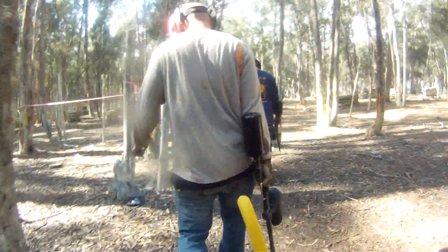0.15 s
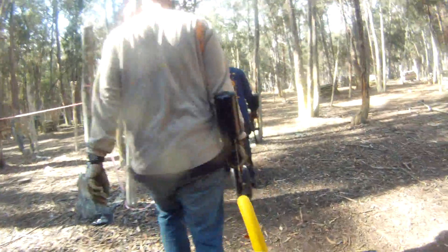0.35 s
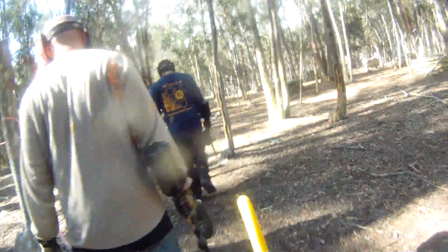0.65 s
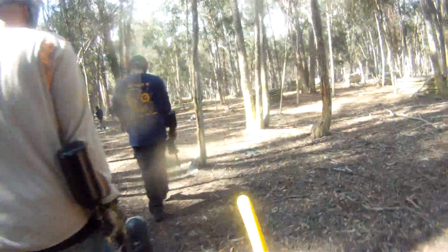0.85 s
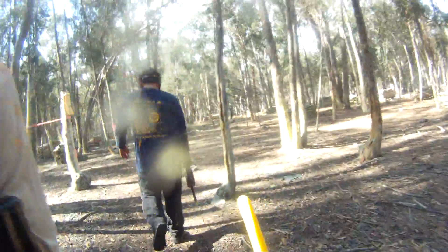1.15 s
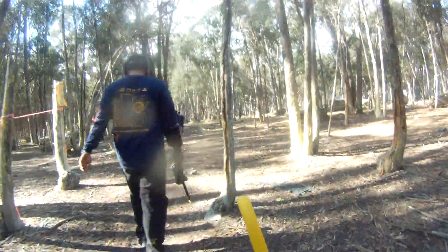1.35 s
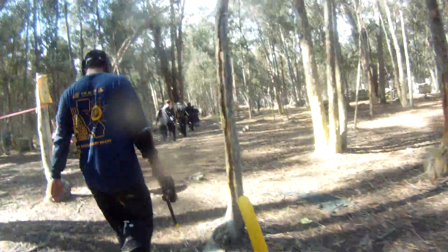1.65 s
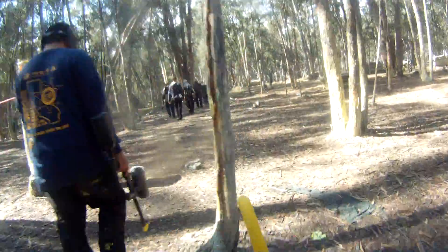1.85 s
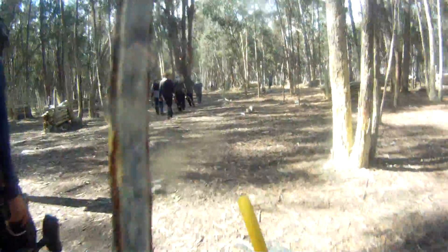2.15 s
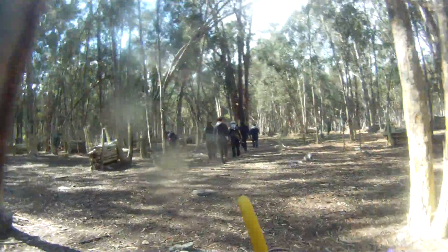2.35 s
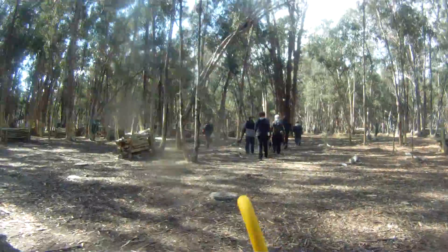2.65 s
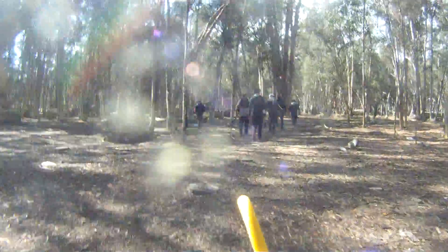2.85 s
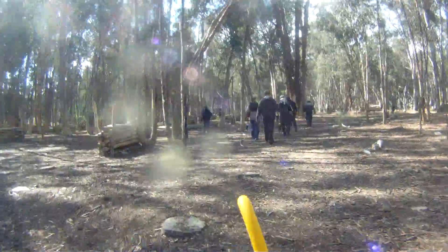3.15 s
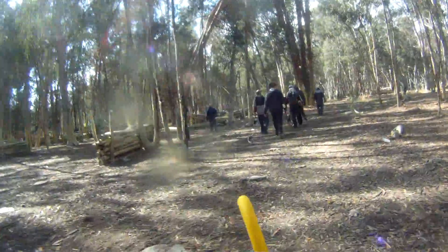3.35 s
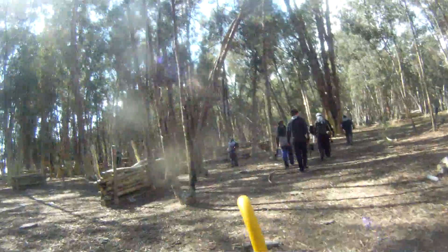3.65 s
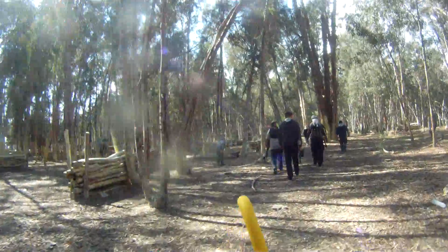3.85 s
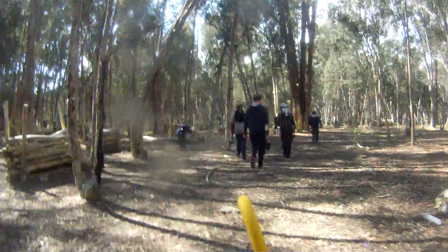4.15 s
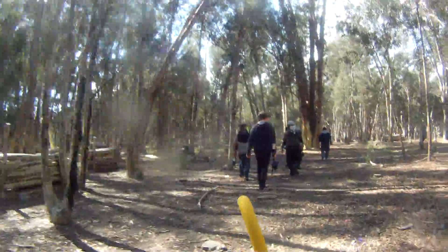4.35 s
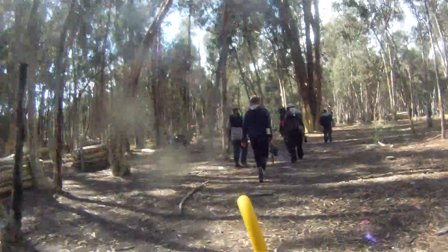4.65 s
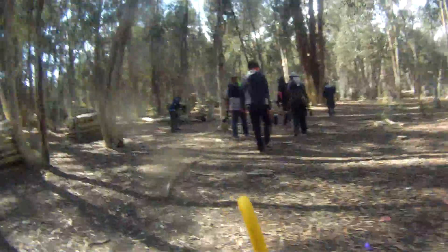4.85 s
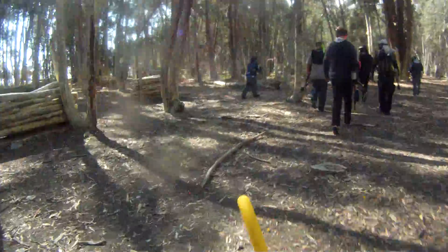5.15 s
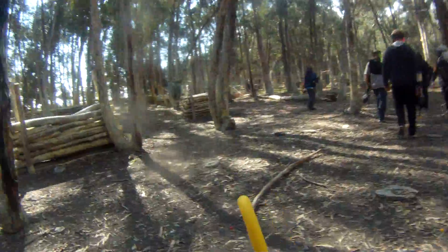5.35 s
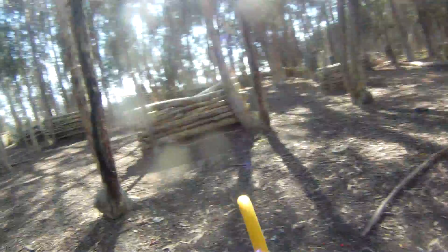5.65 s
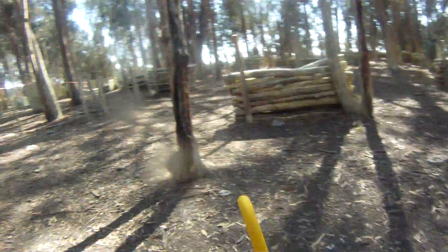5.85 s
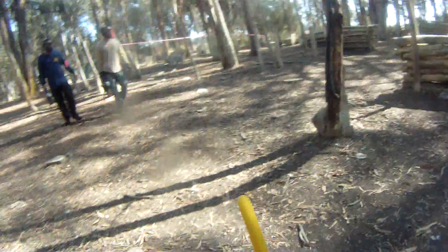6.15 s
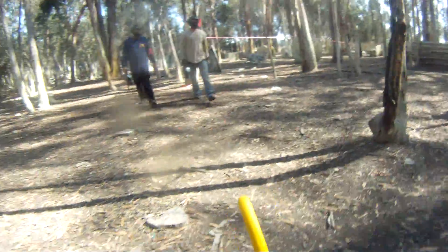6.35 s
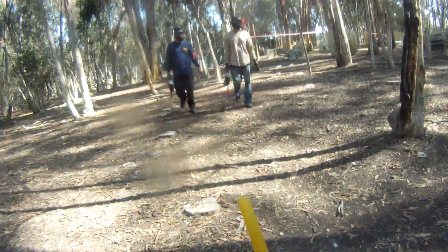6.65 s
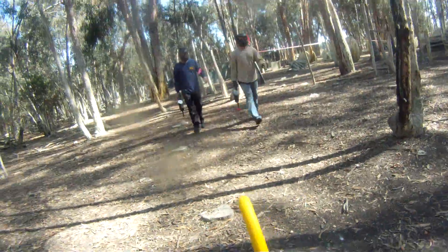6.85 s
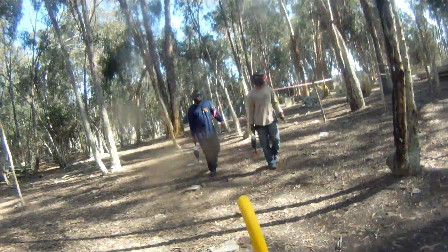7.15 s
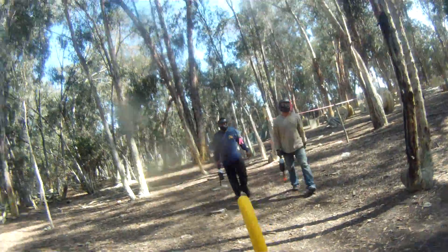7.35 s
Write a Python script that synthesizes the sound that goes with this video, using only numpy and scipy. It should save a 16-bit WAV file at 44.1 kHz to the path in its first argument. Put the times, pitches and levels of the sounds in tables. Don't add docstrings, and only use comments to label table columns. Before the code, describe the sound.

Footsteps crunch over dry leaves and bark, twigs snapping underfoot, while a cased camera's mount thumps and rumbles low against a faint hiss.

```python
import sys
import numpy as np
from scipy import signal
from scipy.io import wavfile
from scipy.ndimage import uniform_filter1d, minimum_filter1d

SR = 44100
rng = np.random.default_rng(int(sys.argv[2]) if len(sys.argv) > 2 else 0)


def store_pcm(level_fs):
    pcm = np.round(np.clip(level_fs, -1, 1) * 32767).astype(np.int16)
    wavfile.write(sys.argv[1], SR, np.atleast_2d(pcm).T)


def to_linear_factor(level_db):
    exponent = np.asarray(level_db, float) / 20
    return 10 ** exponent


N = 330448

# pitch in Hz, level in dB per Hz.
CASE_COLOUR = [(180, -32), (310, -15), (344, -24), (397, -7.5), (445, -7), (580, 4.5), (620, 3.5),
               (708, -8), (757, -11.5), (848, 1.5), (1120, 3), (1510, -7.5), (1980, 3.5), (2430, -19),
               (3000, -25.5), (3900, -155), (6600, -120)]
# start in seconds, peak in dB, ring pitch in Hz, time to fall 60 dB in seconds.
TWIG_SNAPS = [(0.376, -19.5, 1720, 0.01), (0.804, -16.5, 1990, 0.021), (0.926, -14, 2020, 0.032),
              (1.324, -31.5, 1880, 0.0087), (2.159, -15, 1380, 0.017), (2.329, -13, 1840, 0.023),
              (2.581, -21, 1860, 0.0072), (3.378, -11.5, 1720, 0.01), (3.405, -15, 1820, 0.01),
              (3.721, -23, 1850, 0.0084), (3.730, -16, 1800, 0.011), (4.052, -16, 1940, 0.014),
              (4.145, -19, 1680, 0.0055), (4.215, -27, 1810, .012), (1.88, -36, 1820, 0.01),
              (1.709, -24.5, 2200, 0.0071), (2.402, -26, 1070, .012), (4.348, -5, 1700, 0.01),
              (4.541, -24, 1800, 0.01), (4.694, -18, 1900, 0.0059), (4.699, -4.5, 1820, 0.015),
              (5.527, -17, 1680, 0.014), (5.559, -18.5, 1945, 0.014), (6.081, -11.5, 1760, 0.0053),
              (7.148, -14.5, 1970, 0.016)]
# start in seconds, peak in dB, ring pitch in Hz, time to fall 60 dB in seconds.
BARK_CRACKS = [(0.657, -14.5, 1080, 0.02), (1.186, -31.5, 1100, 0.023), (1.386, -10, 1222, 0.098),
               (1.406, -13.5, 1050, .015), (1.506, 0, 1380, 0.0057), (1.529, -16.5, 1070, 0.077),
               (1.581, -13, 970, 0.017), (2.011, -10, 1070, 0.034), (2.123, -7, 1400, 0.0054),
               (2.456, -24.5, 875, 0.046), (2.639, -7.5, 1170, 0.013), (2.731, -9.5, 1090, 0.0029),
               (3.313, -24, 1020, 0.021), (3.748, -16.5, 1160, 0.01), (3.946, -7, 1150, 0.023),
               (4.003, -13, 600, 0.02), (4.109, -16, 1120, 0.017), (4.157, -11.5, 977, 0.046),
               (4.5, -29.5, 1100, 0.039), (4.622, -12.5, 1100, 0.022), (4.754, -4.5, 1330, 0.012),
               (4.776, -16.5, 1010, .015), (4.872, -23.5, 1010, 0.022), (5.025, -14, 915, 0.0093),
               (5.279, -14.5, 990, 0.038), (5.469, -10.5, 1140, 0.0028), (6.066, -44, 533, 0.017),
               (6.449, -24, 1160, 0.019), (6.638, -21.5, 1031, 0.017), (6.695, -29.5, 1140, 0.015),
               (7.102, -13.5, 1116, 0.03), (7.244, -34.5, 1200, 0.0086), (7.422, -28.5, 600, 0.028)]


def evened(x):
    return x / np.sqrt(np.mean(x ** 2) + 1e-20)


def coloured(x, points):
    f, db = np.transpose(points)
    hz = abs(np.fft.fftfreq(2 ** 14, 1 / SR))
    all_db = np.interp(np.log(hz + 1), np.log(f + 1), np.maximum(db, -90))
    log_gain = all_db * np.log(10) / 20
    response = np.exp(np.conj(signal.hilbert(log_gain)))
    taps = np.fft.ifft(response).real[:2 ** 13]
    return signal.oaconvolve(x, taps)[:len(x)]


def low_passed(x, cut_hz):
    return signal.sosfilt(signal.butter(4, cut_hz, fs=SR, output="sos"), x)


def clumps(spread_db, s):
    width = max(round(s * SR), 2)
    drift = uniform_filter1d(uniform_filter1d(rng.standard_normal(N), width), width)
    return to_linear_factor(spread_db * evened(drift))


def steadied(x, s, share):
    power = abs(uniform_filter1d(evened(x) ** 2, max(round(s * SR), 2))) + 1e-3
    return evened(x / power ** (np.clip(share, 0, 1) / 2))


def grains(per_s, spread_db, low_hz, high_hz, turns, count=16):
    size = to_linear_factor(spread_db * np.minimum(rng.exponential(1, N), 4)) * rng.choice([-1., 1.], N)
    size = size * (rng.random(N) < per_s / SR)
    kind, out = rng.integers(0, count, N), np.zeros(N)
    for k, hz in enumerate(np.geomspace(low_hz, high_hz, count)):
        cycles = np.arange(1024) / SR * hz
        grain = np.sqrt(hz) * cycles * np.exp(-cycles / turns) * np.sin(2 * np.pi * cycles)
        out += signal.oaconvolve(size * (kind == k), grain)[:N]
    return out


def curve(rows):
    s, *values = np.transpose(rows)
    return [np.interp(np.arange(N) / SR, s, v) for v in values]


def bursts(rows, rise, sag_db, fall):
    linger = 0.097
    t, power = np.arange(N) / SR, np.zeros((2, N))
    for s, length, db, *above_db in rows:
        a, b = np.searchsorted(t, [s - rise / 2, s + length + 12 * fall])
        u = t[a:b] - s
        gone = np.maximum(u - length, 0) / fall
        let_go = np.exp(-gone) + linger * np.exp(-gone / 2.3)
        shape = np.clip(u / rise + .5, 0, 1) ** 2 * let_go
        held_db = db - sag_db * (u / length - .5)
        power[:, a:b] += (shape * to_linear_factor(held_db + np.c_[[0, sum(above_db)]])) ** 2
    return power


def ring(peak_db, hz, t60, rise, sag):
    t = np.arange(8192) / SR
    t60 = max(t60, .003)
    shape = to_linear_factor(-60 * t / t60) * (1 - np.exp(-t / rise)) ** 2
    turns = np.cumsum(hz * (1 - sag + sag * np.exp(-t / t60 * 2))) / SR
    return to_linear_factor(peak_db) * shape / shape.max() * np.sin(2 * np.pi * turns)


def add(mix, s, sound):
    part = mix[round(s * SR):][:len(sound)]
    part += sound[:len(part)]


def hiss():
    # pitch in Hz, level in dB per Hz.
    hiss_colour = [(150, -40), (250, -11), (322, 26), (526, 24.5), (754, 12), (920, -52), (1910, -15),
                   (2740, 12), (6000, 4.5), (7800, -88), (13200, -120)]
    return to_linear_factor(-64) * evened(coloured(rng.standard_normal(N), hiss_colour))


def mount():
    # time in seconds, wobble level in dB.
    sway = [(0, -53.5), (.3, -47), (.55, -44.5), (1.06, -52), (1.3, -42), (1.62, -28), (1.95, -44),
            (2.5, -35), (2.9, -31), (3.2, -37), (3.5, -29.5), (3.87, -37), (4.5, -46), (5.1, -32),
            (6, -28.5), (6.75, -35.5), (7, -33.5), (7.3, -37.5)]
    # start in seconds, length in seconds,
    # wobble level in dB, rumble level above it in dB.
    jolts = [(.105, 0.12, -27.5, -9), (.234, 0.24, -32, -15.5), (.369, 0.031, -16, -17),
             (.629, 0.29, -21, -9.5), (.853, 0.18, -29.5, -14), (1.117, 0.065, -32, -12.5),
             (1.337, 0.24, -21.5, -5.5), (1.661, 0.16, -17.5, -11), (1.821, 0.076, -24, -20.5),
             (2.01, 0.12, -17.5, -10.5), (2.14, 0.32, -25, -10.5), (2.604, 0.16, -18.5, -10.5),
             (3.068, 0.081, -32, -7), (3.317, 0.12, -27, -3), (3.392, 0.065, -15.5, -21),
             (3.527, 0.032, -17.5, -20), (3.702, 0.093, -27.5, -1), (3.781, 0.028, -16.5, -14),
             (3.961, 0.2, -19.5, -7), (4.166, 0.31, -25, -15), (4.375, 0.043, -21.5, -8.5),
             (4.545, 0.32, -24, -4), (4.964, 0.07, -18, -23), (5.019, 0.035, -12, -10.5),
             (5.253, 0.17, -26.5, -5), (6.136, 0.039, -15.5, -25), (6.42, 0.13, -27, -11),
             (6.859, 0.097, -32, -2), (7.095, 0.086, -23, -30), (7.363, 0.15, -27, -13.5),
             (0.596, 0.041, -28.5, -7),
        (0.752, 0.075, -16, -15),
        (1.972, 0.025, -28.5, 1),
        (2.733, 0.011, -17.5, -2.5),
        (3.899, 0.051, -28.5, 0.5),
        (4.333, 0.019, -31, 7.5),
        (7.059, 0.054, -24.5, -5),
    ]
    # pitch in Hz, level in dB per Hz.
    rumble_colour = [(12, -87), (20, -38), (43, -13.5), (69, -1), (87, 0), (97, -2), (119, -9), (209, -17),
                     (287, -38), (330, -60.5), (430, -39.5), (730, -120)]
    # start in seconds, peak in dB, ring pitch in Hz.
    kick_rows = [(0.113, -6, 82), (0.376, -7, 88), (0.747, -19, 85), (1.339, -6, 86), (1.398, -17, 87),
                 (1.509, -1, 89), (1.677, -5, 87.6), (2.008, -6, 95), (2.327, -4.5, 73.6),
                 (2.378, -4.5, 87), (2.608, -28, 82), (2.654, -27, 88), (2.734, 1.5, 87),
                 (3.067, -5.5, 90.7), (3.4, -4, 82.5), (3.532, -15, 76.4), (3.71, -19, 80), (3.78, -15, 88),
                 (4.05, -0.5, 79.6), (4.344, -13, 75), (4.543, -3.5, 83), (5.018, -18, 172),
                 (5.024, -13, 82.6), (6.139, -11, 85), (6.869, -6.5, 101.4), (7.102, -5, 90)]
    wobble_hz, sway_rumble_db = 85.55, -5.5

    sway_db, = curve(sway)
    pushes = bursts(jolts, rise=0.015, sag_db=0, fall=0.018)
    level, shake = np.sqrt(pushes + to_linear_factor(sway_db + np.c_[[0, sway_rumble_db]]) ** 2)

    nudges = uniform_filter1d(rng.standard_normal((2, N)), 1500, axis=1)
    a, b = evened(uniform_filter1d(nudges, 1100, axis=1))
    swing = 1 + 0.98 * (a + 1j * b)
    swing = swing / (uniform_filter1d(abs(swing), 1200) + 0.42) ** 0.78
    wobble = evened((swing * np.exp(2j * np.pi * wobble_hz * np.arange(N) / SR)).real)

    f, db = np.transpose(rumble_colour)
    flat = np.transpose([f, np.where(abs(np.log(f / 85)) < .3, -21, db)])
    shaking = rng.standard_normal(N) * clumps(3.3, 0.019)
    rumble = steadied(coloured(shaking, flat), 0.029, 0.37)

    kicks = np.zeros(N)
    for s, peak_db, hz in kick_rows:
        add(kicks, s, ring(peak_db - 10.5, hz, t60=0.16, rise=0.0056, sag=0.07))
    return level * wobble + to_linear_factor(2.0) * shake * rumble + kicks


def crunch():
    # time in seconds, low crunch level in dB, bright crunch above it in dB.
    shuffle = [(0, -56, -12), (.55, -59, -1), (1.05, -60, 1.5), (1.35, -52.5, -3.5), (1.63, -44.5, -4),
               (1.93, -50, -3.5), (2.3, -40.5, -1), (2.53, -49, -2.5), (2.98, -41, -19), (3.2, -53.5, 3),
               (3.5, -40.5, -10), (3.88, -51.5, -2), (4.5, -48, -3.5), (4.97, -45, -3), (5.46, -47, -1.5),
               (6.03, -55.5, -9), (6.75, -57.5, -6.5), (7.3, -48.5, -10)]
    # start in seconds, length in seconds,
    # low crunch level in dB, bright crunch above it in dB.
    soles = [(.1, 0.032, -42.5, -2), (.14, 0.064, -35.5, -17.5), (.22, 0.024, -39.5, -9.5),
             (.354, 0.082, -40, -5), (.585, 0.0071, -47.5, 9), (.615, 0.18, -36, -4),
             (.8, 0.085, -30, -6.5), (.87, 0.023, -28, -17), (.915, 0.039, -27, -8.5),
             (.963, 0.096, -47.5, -31), (1.427, 0.17, -25, -11.5), (1.66, 0.071, -30.5, -13),
             (1.745, 0.1, -30, -10.5), (1.971, 0.068, -36, -7.5), (2.05, 0.13, -26.5, -1),
             (2.574, 0.029, -34, 3), (2.615, 0.19, -28.5, -3.5), (2.779, 0.17, -38, -5.5),
             (3.038, 0.11, -35, -6), (3.295, 0.073, -28, -17.5), (3.375, 0.08, -27.5, -3.5),
             (3.47, 0.016, -32.5, -6.5), (3.537, .12, -29, -12.5), (3.692, 0.1, -26.5, -11),
             (3.796, 0.063, -37, -10), (3.916, 0.28, -29, -15.5), (4.205, 0.23, -36.5, -6),
             (4.345, 0.11, -31.5, -13), (4.595, 0.25, -27.5, -7), (4.86, 0.056, -30.5, -30),
             (5.024, 0.066, -25, -9.5), (5.123, 0.034, -36, 2.5), (5.263, 0.097, -25.5, -12),
             (5.373, 0.063, -33.5, -15), (5.527, 0.096, -38, -5), (5.63, 0.13, -39.5, -2.5),
             (5.775, 0.083, -37.5, -14.5), (5.835, 0.074, -44.5, 3), (5.915, 0.091, -34, -21),
             (6.066, 0.11, -39, 0.5), (6.17, 0.056, -41.5, -6), (6.235, 0.06, -36.5, -15),
             (6.3, 0.084, -29, -10.5), (6.4, 0.033, -36.5, -9), (6.45, 0.084, -36.5, -9),
             (6.625, 0.079, -37, -22), (6.894, 0.076, -33, -11.5), (7.089, 0.082, -33, -13),
             (7.418, 0.12, -31, -17)]
    # start in seconds, length in seconds,
    # low crunch level in dB, bright crunch above it in dB.
    presses = [(.654, 0.06, -16, -18), (.713, 0.069, -26.5, -7), (1.388, 0.037, -13, -12),
               (1.756, 0.067, -26.5, -2.5), (2.01, 0.032, -14.5, -14), (2.614, 0.034, -24.5, -26),
               (2.633, 0.033, -16.5, -13.5), (3.941, 0.07, -14, -16), (4.001, 0.03, -21.5, -13),
               (4.116, 0.031, -20, -9), (4.345, 0.059, -25, -4.5), (4.62, 0.056, -15.5, -8),
               (4.674, 0.15, -26, -12), (4.754, 0.041, -17.5, -4.5), (5.637, 0.047, -30, -11.5),
               (5.966, 0.028, -28, -7.5), (6.495, 0.05, -48.5, 7), (6.82, 0.14, -52, 4.5),
               (7.358, 0.3, -51.5, 6), (1.931, 0.047, -62, 15), (7.019, 0.16, -48.5, 3),
               (7.089, 0.045, -22, -15.5), (1.125, 0.03, -42.5, -3), (2.115, 0.015, -38, 5),
               (4.965, 0.072, -48, 2)]
    # start in seconds, length in seconds, level in dB.
    singing = [
        (1.75, 0.14, -62.5),
        (4.63, .03, -58),
        (5.56, 0.055, -70),
        (5.66, 0.019, -70),
        (6.08, .06, -64),
    ]
    # pitch in Hz, level in dB per Hz.
    whistle_colour = [(3000, -47), (3400, -4), (3600, 0.5), (3900, -6.5), (4300, -42)]

    low_db, bright_db = curve(shuffle)
    feet = bursts(soles, rise=0.018, sag_db=2, fall=0.0065)
    feet = feet + bursts(presses, rise=0.022, sag_db=6, fall=0.003)
    low, high = np.sqrt(feet + to_linear_factor([low_db, low_db + bright_db]) ** 2)

    giving = clumps(5.3, 0.014)
    dull_grains = giving * grains(1150, 3.1, 350.4, 1378, turns=1.0)
    dull = steadied(coloured(dull_grains, CASE_COLOUR), 0.017, 0.91)
    bright_grains = giving * grains(1000, 3.3, 1336, 2895, turns=1.55)
    bright = steadied(coloured(bright_grains, CASE_COLOUR), 0.029, 0.52)
    body = to_linear_factor(-2.66) * low * dull + to_linear_factor(-0.75) * high * bright

    whistle = evened(coloured(rng.standard_normal(N) * clumps(2.5, .012), whistle_colour))
    sung = bursts(singing, rise=.015, sag_db=1.5, fall=.012)[0]
    seal = np.sqrt((to_linear_factor(-40.0) * high ** 0.76) ** 2 + sung) * whistle
    return low_passed(body, 2650) + seal


def rustle():
    # start in seconds, length in seconds, level in dB.
    brushes = [(.09, 0.044, -76.5), (.384, 0.027, -58), (.609, 0.023, -58.5), (.645, 0.052, -55),
               (.735, 0.036, -53), (.8, 0.071, -58), (1.494, 0.0098, -55), (1.307, 0.13, -65.5),
               (1.452, 0.16, -57.5), (1.636, 0.19, -59), (1.811, 0.17, -72.5), (2.01, .175, -61.5),
               (2.335, 0.041, -66.5), (2.554, .305, -61.5), (2.699, 0.053, -57), (3.058, 0.012, -52),
               (3.395, .05, -60.5), (3.532, 0.044, -54.5), (3.595, .025, -54.5), (3.697, 0.075, -60.5),
               (3.861, .04, -65), (3.931, 0.044, -49), (3.981, 0.037, -59), (4.021, 0.14, -54),
               (4.265, 0.026, -60), (4.345, 0.078, -54.5), (4.55, 0.031, -59), (4.62, .225, -65),
               (4.704, 0.1, -51.5), (4.844, 0.24, -71.5), (5.024, 0.05, -56), (5.068, 1.6, -78.5),
               (6.849, 0.049, -62), (7.423, .03, -67)]
    # start in seconds, peak in dB.
    leaf_ticks = [(0.09, -35.5), (0.386, -45), (0.612, -32), (0.6928, -37), (0.838, -38.5), (1.445, -43),
                  (1.5525, -34), (1.641, -30.5), (1.6851, -34), (1.76, -31.5), (1.7833, -36),
                  (2.2656, -33.5), (2.368, -33), (2.576, -32), (2.707, -30), (3.403, -33), (3.479, -38),
                  (3.5405, -33), (3.6, -36), (3.933, -33.5), (4.552, -34.5), (5.9253, -37.5), (6.1533, -41),
                  (6.855, -36.5), (7.437, -38),
                  (0.123, -42), (0.3262, -38), (0.3556, -44), (0.409, -48), (0.6246, -34), (0.6465, -50),
              (0.726, -36), (0.913, -47), (1.4533, -34), (1.7447, -41), (1.801, -54), (2.052, -46),
              (2.0975, -39), (2.1914, -49.5), (2.5568, -49), (3.3019, -41), (3.3588, -41), (3.3773, -42),
              (3.4207, -36), (3.441, -39), (3.8636, -45), (4.0264, -45), (4.0706, -47), (4.1534, -30.5),
              (4.2677, -40), (4.5211, -43), (4.7353, -35), (4.766, -38), (4.8394, -39), (4.953, -41.5),
              (5.469, -41.5), (5.67, -43), (6.3295, -47), (6.9174, -38.5)]
    # pitch in Hz, level in dB per Hz.
    seal_colour = [(1470, -26), (2500, 2), (2870, -19.5), (3280, -6), (3610, -3.5), (4100, -1.5),
                   (4480, -7.5), (5050, -5), (6000, -16), (7800, -57), (13200, -120)]
    floor_db, snap_leak_db = -74.5, -32.5

    brushing = bursts(brushes, rise=0.0055, sag_db=-1, fall=0.003)[0]
    level = np.sqrt(brushing + to_linear_factor(floor_db) ** 2)
    fine = evened(grains(480, 3.5, 1840, 6000, turns=0.2, count=6)) + 0.46 * rng.standard_normal(N)
    scrape = steadied(coloured(fine * clumps(3.7, 0.013), seal_colour), 0.2, 1.0)

    puffs, t = np.zeros(N), np.arange(2048) / SR
    leaks = [(s, db + snap_leak_db) for s, db, *_ in [*TWIG_SNAPS, *BARK_CRACKS]]
    for s, peak_db in [*leaf_ticks, *leaks]:
        add(puffs, s, to_linear_factor(peak_db - 4.5 - 60 * t / 0.021) * (1 - np.exp(-t / 0.00046)))
    ticks = puffs * steadied(coloured(rng.standard_normal(N), seal_colour), 0.0041, 0.55)
    return to_linear_factor(4.0) * level * scrape + ticks


def snaps():
    # start in seconds, peak in dB, ring pitch in Hz.
    crackle_rows = [(0.34, -28, 1850), (0.674, -7, 890), (0.692, -15, 900), (0.72, -10.5, 1840),
                    (0.746, -15, 1150), (0.823, -14, 1830), (0.837, -13, 1074), (0.916, -23, 2070),
                    (1.008, -27, 1010), (1.082, -31, 1910), (1.443, -13.5, 1910), (1.693, -15.5, 1250),
                    (1.764, -24, 1070), (1.784, -20, 1010), (1.8, -16, 1000), (2.052, -11, 1790),
                    (2.097, -12, 1060), (2.231, -20.5, 930), (2.32, -21, 1650), (2.433, -19.5, 920),
                    (2.481, -20.5, 1060), (2.492, -22.5, 1070), (2.528, -27, 1190), (2.619, -20, 1050),
                    (2.811, -17, 1050), (2.848, -14.5, 930), (2.868, -17.5, 980), (3.039, -27, 890),
                    (3.105, -16.5, 1140), (3.133, -19, 930), (3.329, -10.5, 1140), (3.422, -16, 1080),
                    (3.44, -16, 1090), (3.598, -36, 953), (3.782, -19, 1140), (3.921, -21, 1130),
                    (4.081, -9, 920), (4.122, -6.5, 1210), (4.368, -11, 1080), (4.389, -13, 965),
                    (4.612, -17, 960), (4.632, -2, 1190), (4.664, -8, 1070), (4.717, -14, 1890),
                    (4.736, -9, 918), (4.765, -3, 1170), (4.794, -10, 940), (4.892, -20, 1080),
                    (5.005, -18.5, 1840), (5.207, -26.5, 1920), (5.259, -19, 860), (5.338, -20, 990),
                    (5.362, -17, 1100), (5.637, -22, 840), (5.781, -23, 1170), (5.798, -20, 1070),
                    (5.874, -16, 915), (5.968, -15, 955), (6.269, -23.5, 1050), (6.336, -16, 1090)]
    crackles = [(s, db - 6, hz, 0.02) for s, db, hz in crackle_rows]

    knock, rings = np.zeros(N), np.zeros(N)
    for s, peak_db, hz, t60 in [*TWIG_SNAPS, *BARK_CRACKS, *crackles]:
        knock[round((s + .0015) * SR)] += to_linear_factor(peak_db)
        add(rings, s + 0.00051, ring(peak_db, hz, t60, rise=0.00049, sag=0.03))
    one_knock = np.r_[1., np.zeros(4096)]
    unit = abs(coloured(one_knock, CASE_COLOUR)).max()
    return to_linear_factor(-1.3) * low_passed(rings, 2400) + to_linear_factor(-0.5) * coloured(knock, CASE_COLOUR) / unit


def hardest_snap(mix):
    hardest = 3.7004, 1.2, 1780, .0095
    s, peak_db, hz, t60 = hardest
    add(mix, s, -ring(peak_db, hz, t60, rise=.0008, sag=.06))


def scene():
    mix = hiss() + mount() + crunch() + rustle() + snaps()
    give = minimum_filter1d(np.minimum(.88 / (abs(mix) + 1e-9), 1), 161)
    mix = mix * uniform_filter1d(give, 161)
    hardest_snap(mix)
    ending = np.minimum((N - np.arange(N)) / 300, 1)
    return (ending * mix)[None]


def band_limit(x):
    return signal.sosfilt(signal.butter(12, 15480, fs=SR, output="sos"), x)


def record(dry):
    slow = signal.resample_poly(dry, 40, 147, axis=1, padtype="edge")
    slow = np.clip(slow, -1.02, 1.02)
    held = np.repeat(slow, 4, axis=1)
    held = signal.resample_poly(held, 147, 160, axis=1, padtype="edge")[:, :N]
    band = signal.sosfilt(signal.butter(12, 15150, fs=SR, output="sos"), held)
    return band_limit(np.clip(band, -1, 1))


dry = scene()
out = record(dry)
store_pcm(out)
```